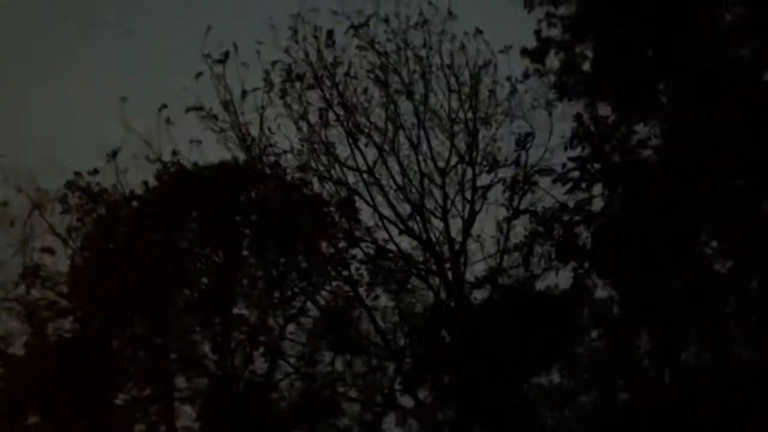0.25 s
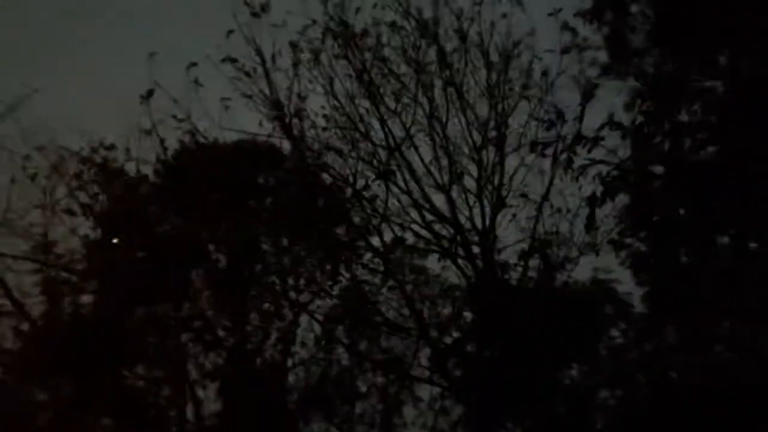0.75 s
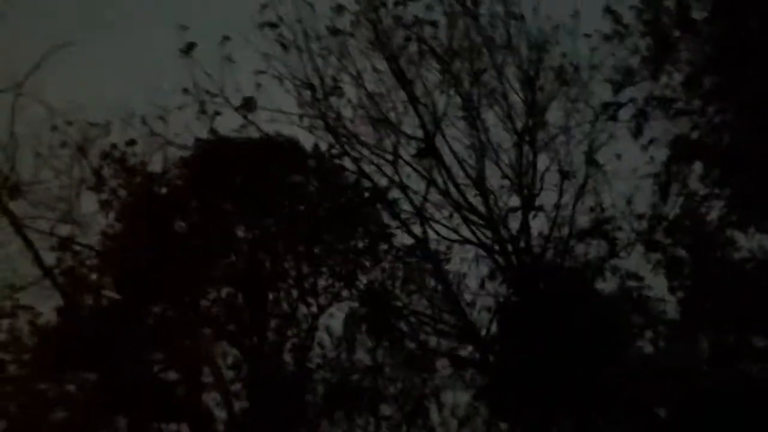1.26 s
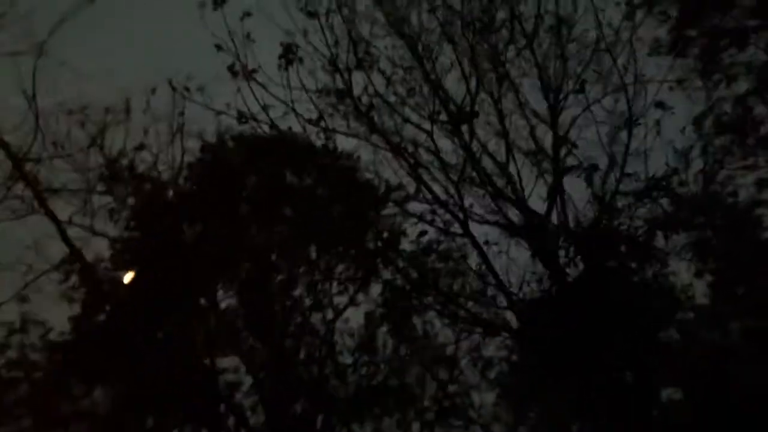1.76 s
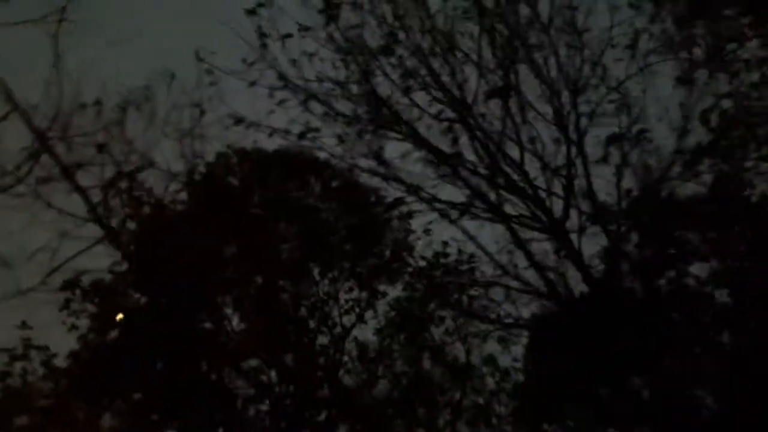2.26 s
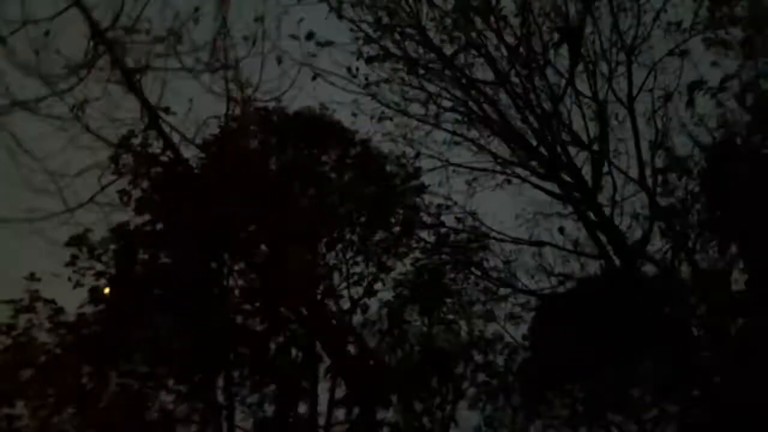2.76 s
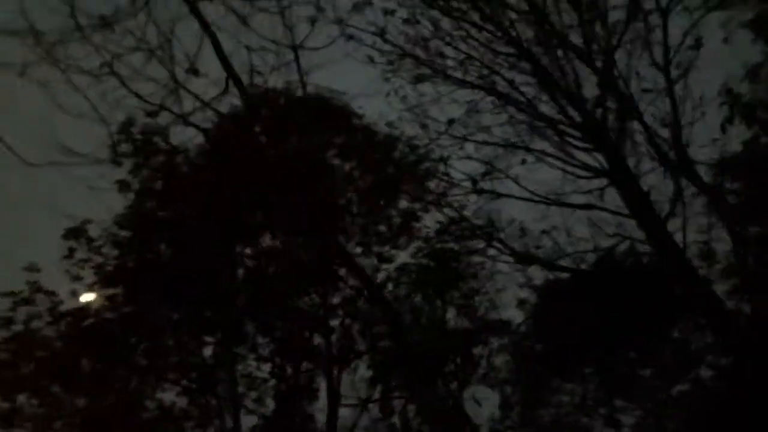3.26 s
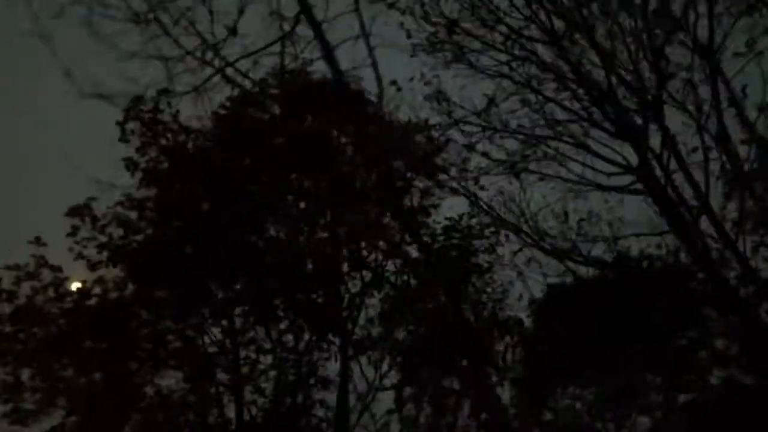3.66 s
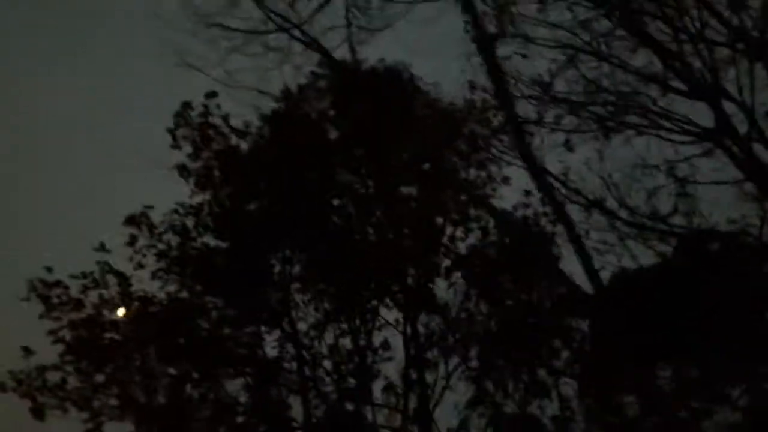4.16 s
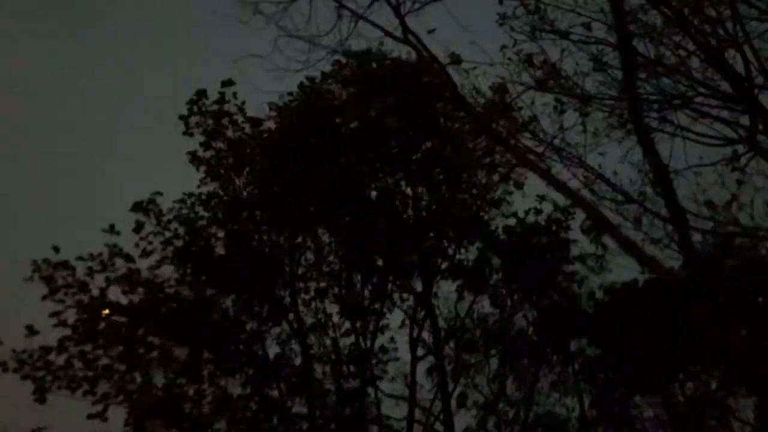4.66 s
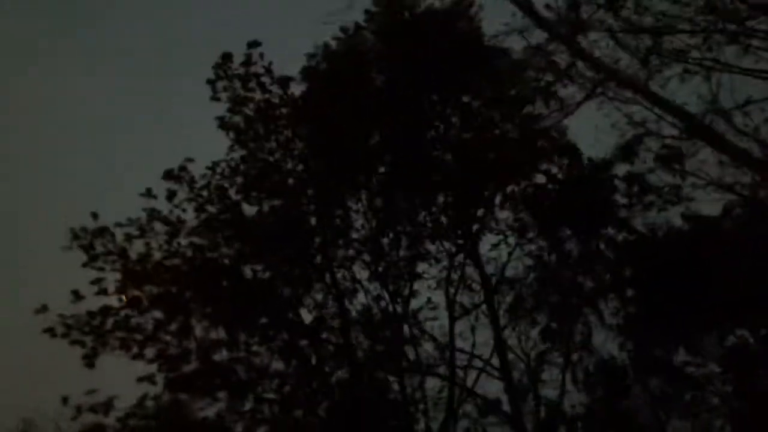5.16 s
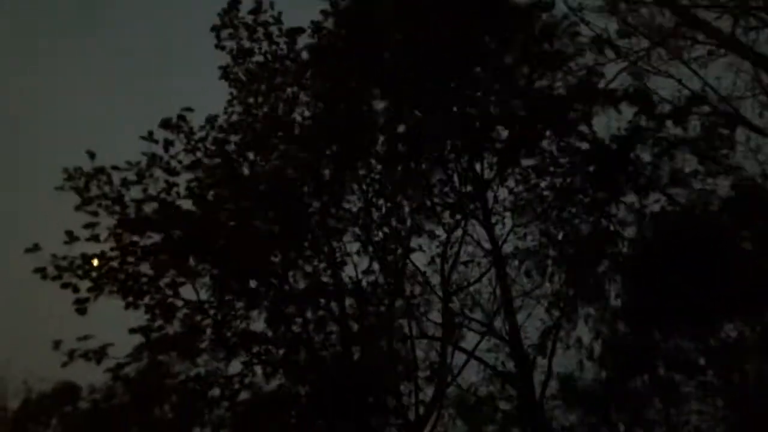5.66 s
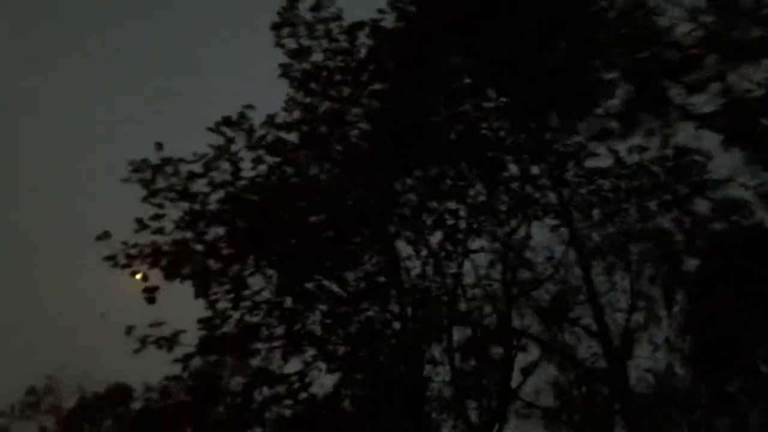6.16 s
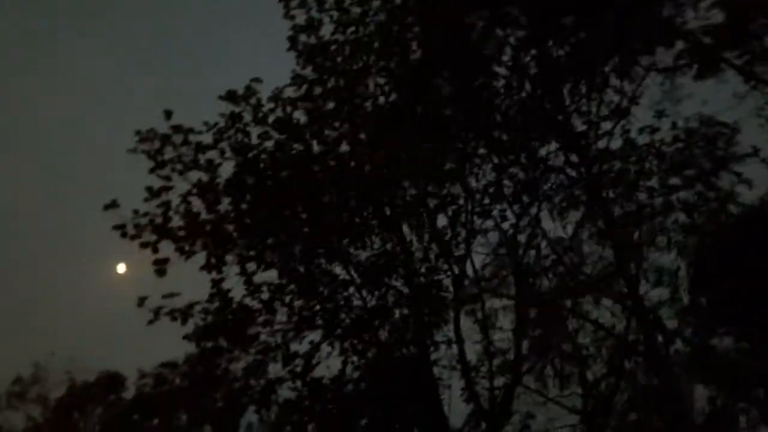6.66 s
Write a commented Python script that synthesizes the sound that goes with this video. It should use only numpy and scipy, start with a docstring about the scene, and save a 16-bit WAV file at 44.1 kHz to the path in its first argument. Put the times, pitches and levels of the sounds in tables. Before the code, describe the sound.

A dense dawn chorus of hundreds of distant birds fills a wooded place from start to finish. Nearer birds stand out with short whistles, chips and raspy calls that echo briefly between the trunks. A faint low rumble of far traffic and air lies underneath. The handheld microphone picks up a few soft thuds, rubs and knocks from fingers, mostly in the first half.

```python
"""A shimmering wash of birdsong comes first: a dawn chorus of hundreds of far birds, blurred by trees.
Under it lie a faint far rumble and the thuds, rubs and knocks of a hand turning the microphone.
A few nearer birds stand out with whistles, chips and raspy notes that echo between the trunks.
Each bird's syrinx gives a gliding tone, raspy when it flutters and hoarse when it turns chaotic."""
import sys
import numpy as np
from scipy import signal
from scipy.fft import rfft, irfft, next_fast_len
from scipy.io import wavfile

SR = 44100
rng = np.random.default_rng(int(sys.argv[2]) if len(sys.argv) > 2 else 0)


def put_to_file(sound):
    """Save the sound as 16-bit audio at rate SR, in the file named by the first command-line argument."""
    columns = np.atleast_2d(sound).T  # one column per channel
    safe = np.clip(columns, -1, 1)
    whole_steps = np.round(safe * 32767)
    wavfile.write(sys.argv[1], SR, whole_steps.astype(np.int16))


N = 304290
TIME = np.arange(N) / SR
CUTOFF_HZ = 15750


def from_db(db):
    """Decibels to gain."""
    return 10 ** (np.asarray(db) / 20)


def rms_one(x):
    """Scale to unit power."""
    return x / np.sqrt(np.mean(x ** 2) + 1e-20)


def add(track, start_s, sound):
    """Mix a sound into a track, dropping what falls outside."""
    at = int(start_s * SR)
    first, last = max(at, 0), min(at + len(sound), N)
    if last > first:
        track[first:last] += sound[first - at:last - at]


def coloured(x, eq_curve, low_hz=10, high_hz=CUTOFF_HZ):
    """EQ a sound between a steep low cut and high cut; unit power."""
    size = next_fast_len(len(x))
    hz = np.maximum(np.arange(size // 2 + 1) * SR / size, 1)
    points_hz, db = np.transpose(eq_curve)
    eq = from_db(np.interp(np.log(hz), np.log(points_hz), db))
    edges = (1 + (low_hz / hz) ** 60 + (hz / high_hz) ** 60) ** -.5
    return rms_one(irfft(rfft(x, size) * edges * eq, size)[:len(x)])


def waver(size, rate):
    """A random modulator gliding through `rate` new values a second."""
    position = np.arange(size) * rate / SR
    count = int(position[-1]) + 2
    return np.interp(position, np.arange(count), rng.standard_normal(count))


def swell(size):
    """An envelope with a quick attack, a rounded top and a quick release."""
    u = (np.arange(size) + .5) / size
    return (4 * u * (1 - u)) ** 0.59


def syllable(length_s, first_hz, middle_hz, last_hz, flutter):
    """The syrinx gives a pure tone that bends through three pitches; flutter makes it raspy."""
    size = max(int(length_s * SR), 16)
    u = np.arange(size) / size
    arch_hz = middle_hz - (first_hz + last_hz) / 2
    hz = first_hz + (last_hz - first_hz) * u + arch_hz * 4 * u * (1 - u)
    phase = 2 * np.pi * np.cumsum(hz * (1 + flutter * waver(size, rate=700))) / SR
    envelope = swell(size) * (1 + 0.16 * waver(size, rate=150))   # paths through the branches interfere
    return np.sqrt(2) * envelope * np.sin(phase)


def wood_reverb(x, t60_s, attack_s=0.0059):
    """Trunks and leaves scatter a sound into a dense dying tail."""
    t = TIME[:SR]
    tail = rng.standard_normal(len(t)) * from_db(-60 * t / t60_s) * (1 - np.exp(-t / attack_s))
    return signal.fftconvolve(x, tail / np.sqrt(np.sum(tail ** 2)))


def flock(low_hz, high_hz, per_s, length_s, glide=.09, spread_db=2.5):
    """Far birds utter gliding syllables at random, heard as an even mix of dry song and echo."""
    song, calls = np.zeros(N), int(per_s * N / SR)
    placings = rng.random((calls, 2))
    variations = np.clip(rng.standard_normal((calls, 4)), -2, 2)
    for (when, pitch), (stretch, slope, bend, accent) in zip(placings, variations):
        centre_hz = low_hz + pitch * (high_hz - low_hz)
        contour_hz = centre_hz * np.exp(glide * np.array([-slope, bend / 2, slope]))
        call = syllable(length_s * 2 ** (stretch / 2), *contour_hz, flutter=0.0246)
        add(song, when * N / SR - length_s / 2, from_db(spread_db * accent) * call)
    echoes = wood_reverb(song, t60_s=0.77)
    add(echoes, 0, echoes[N:].copy())   # wrap the tail: the wood already rings with earlier song
    return rms_one(echoes[:N] + song)


# EQ of the birdsong, in the song range and in the air above it: f/Hz, level/dB
SONG_EQ = [(900, -22), (1300, -11), (1550, -7.5), (2000, -6), (2550, -3.5), (3050, 0), (3500, -1),
           (4100, -3), (4700, -2), (5250, -8), (6300, -10.5), (7300, -12.5)]
AIR_EQ = [(7900, -24), (8500, -24), (9700, -38), (10400, -38.5), (11900, -31.5), (13600, -45.5),
          (15300, -41)]
# Fader rides as the low, middle, high and top voices swell and ebb: t/s, level/dB (used about its mean)
LOW_RIDE = [(0.0, -38.5), (0.4, -40.5), (0.59, -37), (1.02, -39.5), (1.34, -35.5), (1.61, -38.5),
            (1.88, -40), (2.4, -37.5), (3.15, -41), (3.88, -42), (4.5, -38), (4.96, -42.5), (5.42, -39),
            (5.59, -43), (6.46, -39), (6.9, -41.5)]
MIDDLE_RIDE = [(0.0, -30.5), (1.81, -30), (2.63, -29), (3.02, -30.5), (3.52, -29.5), (3.75, -30.5),
               (4.67, -30.5), (4.78, -30.5), (5.61, -31), (5.82, -30), (6.34, -29.5), (6.9, -30.5)]
HIGH_RIDE = [(0.0, -39.5), (0.71, -39), (1.04, -37.5), (1.32, -39), (2.54, -38.5), (2.92, -40.5),
             (3.21, -38.5), (3.4, -40.5), (4.75, -39.5), (5.67, -40.5), (6.05, -40.5), (6.19, -38),
             (6.9, -42)]
TOP_RIDE = [(0.0, -65.5), (1.34, -63.5), (1.65, -64.5), (1.9, -62.5), (3.07, -65), (3.44, -63.5),
            (3.67, -64.5), (5.77, -65.5), (6.21, -63.5), (6.9, -65.5)]
# Bands of the chorus bed: low f/Hz, high f/Hz, syllables/(1/s), typical length/s, base level/dB,
# hush against syllables/dB, ride depth/ratio
REGISTERS = [(1347, 2550, 80, .09, -40, 0.5, 1.06), (2552, 3600, 100, .06, -35.5, -0.5, .7),
             (3613, 5100, 130, .045, -33, 2, 1.5), (5096, 7900, 100, .045, -39.9, -1, 1),
             (7960, 15800, 45, .025, -59.5, 5.5, 2.3)]
# Brief dips of the whole bed: t/s, half-width/s, level/dB
DIPS = [(5.52, .025, -2), (5.72, 0.013, -3.5)]

def far_chorus(waver_db=0.2):
    """Each register swells with its birds and wavers by itself; its farthest singers blur into a hush."""
    bed = np.zeros(N)
    rides = [LOW_RIDE, MIDDLE_RIDE, MIDDLE_RIDE, HIGH_RIDE, TOP_RIDE]
    for (low_hz, high_hz, per_s, length_s, base_db, hush_db, depth), ride in zip(REGISTERS, rides):
        ride_db = np.interp(TIME, *np.transpose(ride))
        fader_db = base_db + depth * (ride_db - ride_db.mean()) + waver_db * waver(N, rate=6)
        band_share = (high_hz - low_hz) / (SR / 2)
        hush = from_db(hush_db) * rng.standard_normal(N) / np.sqrt(band_share)
        voices = flock(low_hz, high_hz, per_s, length_s) + hush
        bed += from_db(fader_db) * coloured(voices, SONG_EQ + AIR_EQ, low_hz, high_hz)
    dip_db = sum(db * np.exp(-((TIME - at_s) / width_s) ** 2) for at_s, width_s, db in DIPS)
    return from_db(dip_db) * bed


# EQ of the low bed of traffic and air: f/Hz, level/dB
RUMBLE_EQ = [(22, -22), (38, -9), (55, -1.5), (90, 1.5), (150, -0.5), (175, 0), (215, -4.5), (330, -3.5),
             (530, -12), (665, -4), (770, -10), (1000, -4.5), (1300, -5), (1700, -8)]

def far_rumble(level_db=-45.5, waver_db=1.47, hum_hz=172, hum_db=-61):
    """Far traffic and moving air, with a faint unsteady hum."""
    fader_db = level_db + waver_db * waver(N, rate=12)
    air = coloured(rng.standard_normal(N), RUMBLE_EQ, high_hz=1890)
    hum = np.sin(2 * np.pi * np.cumsum(hum_hz + 2.58 * waver(N, rate=5.4)) / SR)
    return from_db(fader_db) * air + from_db(hum_db) * hum


# EQ of a finger rubbing the case: f/Hz, level/dB
RUB_EQ = [(100, -25), (300, 3), (500, 4), (800, -3.5), (1250, 2), (2000, -42), (4000, -34)]
# Handling cues: t/s, length/s, thud f/Hz, thud level/dB, rub level/dB
GRIP_SHIFTS = [(.0, 0.05, 146, -41.5, -67), (0.421, 0.046, 130, -41, -63), (.553, 0.072, 90, -44, -59),
               (.9, 0.045, 167, -46, -64), (1.34, .11, 130, -39.5, -54), (1.521, 0.052, 223, -40, -40),
               (1.977, 0.15, 89.5, -42, -60), (2.215, 0.054, 104, -37, -60),
               (2.285, 0.029, 171, -41.5, -49), (4.847, .05, 130, -45.5, -50),
               (5.813, 0.048, 160, -35, -64), (6.291, 0.039, 170, -41, -53)]

def grip_shifts():
    """Each shift of the grip gives a dull thud of the microphone's case and a short rub."""
    out = np.zeros(N)
    rubbing = coloured(rng.standard_normal(N), RUB_EQ, high_hz=4000)
    for start_s, length_s, thud_hz, thud_db, rub_db in GRIP_SHIFTS:
        size = int(length_s * SR)
        case_band = signal.butter(2, [thud_hz / 1.54, thud_hz * 1.39], "band", fs=SR, output="sos")
        thud = rms_one(signal.sosfilt(case_band, rng.standard_normal(SR // 2))[-size:])
        rub = np.roll(rubbing, -int(start_s * SR))[:size]
        add(out, start_s, swell(size) * (from_db(thud_db) * thud + from_db(rub_db) * rub))
    return out


def note(length_s, hz, glide_octaves, arch=0.0118, flicker_db=3):
    """A slightly arched glide around one pitch; twigs and leaves on the way make it flicker."""
    half_glide = 2 ** (glide_octaves / 2)
    flutter_hz = 100 * (length_s / 0.097) ** .4   # short chips are purer, held notes raspier
    tone = syllable(length_s, hz / half_glide, hz * (1 + arch), hz * half_glide, flutter_hz / hz)
    return tone * rms_one(from_db(flicker_db * waver(len(tone), rate=129.7)))


def stray_notes(per_s=3.9, base_db=-39.5, mean_length_s=.07, low_hz=2394, high_hz=12140):
    """Random cues for soft mid-distance notes that follow the birdsong EQ; rows as in NEAR_NOTES."""
    eq_hz, eq_db = np.transpose(SONG_EQ + AIR_EQ)
    cues = []
    for when, pitch, stretch, slope in rng.random((int(per_s * N / SR), 4)):
        hz = low_hz * (high_hz / low_hz) ** pitch
        glide_octaves = 0.088 * (2 * slope - 1)
        db = base_db + np.interp(hz, eq_hz, eq_db)
        cues.append((when * N / SR, mean_length_s * (.5 + stretch), hz, glide_octaves, db))
    return cues


# Foreground whistles and chips: t/s, length/s, f/Hz, glide/octaves, level/dB
NEAR_NOTES = [ (0.027, 0.11, 2400, 0.2, -38), (.317, 0.045, 3400, -0.086, -34),
              (.468, .04, 6050, -0.1, -39), (.515, 0.095, 3150, -0.057, -33.5),
              (.519, 0.15, 2064, 0.05, -41), (0.77, .12, 3540, -.04, -39), (.878, 0.17, 4660, 0, -39),
              (1.07, .24, 2130, 0, -38.5), (1.094, 0.06, 6060, 0.15, -33.5),
              (1.146, 0.025, 5500, -0.15, -35.5), (1.139, 0.076, 4720, 0.1, -33.5),
              (1.18, 0.073, 2780, .18, -36), (1.266, .17, 4520, 0.3, -38), (1.425, 0.052, 8270, -.04, -54),
              (1.428, .11, 2560, -0.8, -37), (1.7, 0.039, 3280, -.2, -31.5), (1.828, 0.027, 4500, -.2, -28),
              (1.86, 0.11, 3130, .03, -33), (1.93, 0.064, 3830, .11, -32), (1.94, 0.048, 7550, -.03, -43),
              (1.944, 0.0366, 2060, -0.42, -30), (2.049, .16, 1205, .1, -44),
              (2.089, 0.034, 3100, -0, -32.5), (2.144, 0.042, 6470, 0, -40),
              (2.177, 0.032, 4440, -0.075, -28), (2.22, 0.13, 1640, -.03, -39.5),
              (2.345, .06, 3150, .09, -32), (2.438, .07, 8200, -.03, -50), (2.453, 0.078, 2750, -.06, -32),
              (2.779, .041, 4250, 0.24, -28.5), (2.801, 0.12, 1245, 0, -45.5),
              (3.199, .045, 4450, -0.17, -29), (3.288, 0.055, 10850, -.03, -60),
              (3.53, 0.026, 4480, 0, -26), (3.909, 0.15, 2850, -.03, -38.5), (4.14, .08, 2405, -.06, -42),
              (4.32, .08, 10750, -.08, -61), (4.384, 0.0515, 4700, -.07, -28),
              (4.505, 0.063, 6050, 0.061, -43), (4.421, 0.136, 1563, -.06, -42.5),
              (4.641, 0.059, 4350, 0.23, -29.5), (4.874, 0.077, 4000, .04, -30),
              (4.953, .057, 4170, 0.2, -32), (5.208, 0.043, 5580, .12, -37), (5.225, .06, 4490, .02, -34),
              (5.36, 0.06, 3310, -0.17, -34), (5.578, 0.053, 4140, 0.2, -32),
              (5.8, 0.031, 2956, -0.026, -27.5), (5.89, 0.1, 4120, 0.06, -36),
              (6.027, 0.035, 3800, -0.15, -28.5), (6.136, .14, 5840, 0.1, -40.5),
              (6.227, 0.047, 4260, .11, -29.5), (6.29, .16, 2680, 0.63, -37),
              (6.331, 0.19, 1923, 0.02, -39), (6.46, .096, 3260, 0.055, -38),
              (6.757, .09, 3290, 0.03, -37.5)]
# Hoarse calls and bursts of twitter: t/s, length/s, low f/Hz, high f/Hz, level/dB
HOARSE_CALLS = [(0.35, 0.031, 6000, 8900, -40), (1.517, 0.085, 4350, 5000, -34),
                (1.534, .045, 5000, 7500, -37), (1.769, .1, 4200, 5100, -31.5),
                (1.799, 0.14, 5000, 9000, -37.5), (1.869, .09, 2650, 4000, -30),
                (2.464, .085, 2300, 8500, -35), (3.265, 0.14, 5000, 7300, -37.5),
                (4.025, 0.093, 4400, 5050, -34.5), (4.787, 0.17, 4380, 4950, -34),
                (4.87, 0.075, 4570, 7500, -37), (5.222, 0.078, 5200, 7300, -39),
                (5.755, .035, 5200, 8500, -39), (6.133, .098, 4970, 7700, -39)]

def near_birds(echo_db=-7):
    """Single notes and hoarse calls from the nearer trees, each trailing its echo off the trunks."""
    song = np.zeros(N)
    for start_s, length_s, hz, glide_octaves, db in list(NEAR_NOTES) + stray_notes():
        add(song, start_s, from_db(db) * note(length_s, hz, glide_octaves))
    for start_s, length_s, low_hz, high_hz, db in HOARSE_CALLS:   # a chaotic syrinx gives a noise band
        size = int(length_s * SR)
        rasp = coloured(rng.standard_normal(SR // 2), SONG_EQ + AIR_EQ, low_hz, high_hz)
        add(song, start_s, from_db(db) * swell(size) * rasp[:size])
    return song + from_db(echo_db) * wood_reverb(song, t60_s=0.47)[:N]


# Short resonances of the case: f/Hz, level/dB, decay T60/s
CASE_MODES = [(171, -19, 0.019), (400, 1.5, 0.0071), (736, -7.5, 0.0079), (1260, 0.5, 0.0061)]
# Sharp finger hits on the case: t/s, level/dB, hardness as spectral tilt/(dB per octave)
KNOCKS = [(.336, -30, 0), (.552, -19.5, -3), (1.338, -24.5, 4), (1.366, -29, -4), (1.528, -24, -2),
          (2.306, -30, -1), (3.276, -32, 6), (4.246, -28.5, 4), (4.318, -34, 8), (5.761, -36, 6),
          (6.212, -30.5, 8.5)]

def finger_knocks(trim_db=-1, pivot_hz=650):
    """Each knock rings the case's damped modes; a nail wakes the high ones, a fingertip the low ones."""
    out, t = np.zeros(N), TIME[:SR // 10]
    for start_s, hit_db, hardness in KNOCKS:
        for hz, mode_db, t60_s in CASE_MODES:
            tilt_db = hardness * np.log2(hz / pivot_hz)
            onset_db = hit_db + trim_db + mode_db + tilt_db + rng.standard_normal()
            add(out, start_s, from_db(onset_db - 60 * t / t60_s) * np.sin(2 * np.pi * hz * t))
    return out


def scene():
    """The mono mix: birds far and near, over the rumble and the handling noise."""
    birds = far_chorus() + near_birds()
    return (birds + far_rumble() + grip_shifts() + finger_knocks())[None]


def record(dry):
    """The small microphone loses the deepest bass; the top is cut steeply."""
    low_cut = signal.butter(2, 35, "high", fs=SR, output="sos")
    high_cut = signal.ellip(10, .1, 80, CUTOFF_HZ, fs=SR, output="sos")
    return signal.sosfilt(high_cut, signal.sosfilt(low_cut, dry))


dry = scene()
out = record(dry)
put_to_file(out)
```